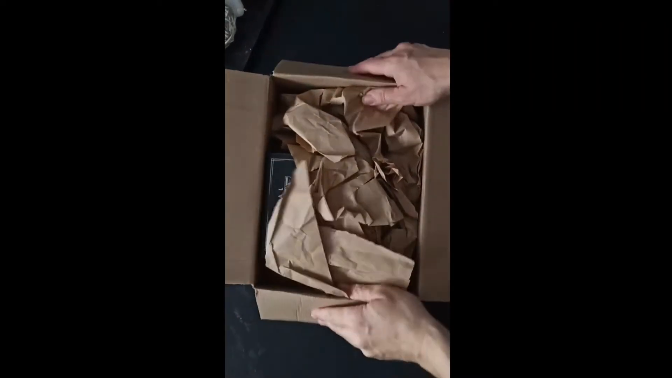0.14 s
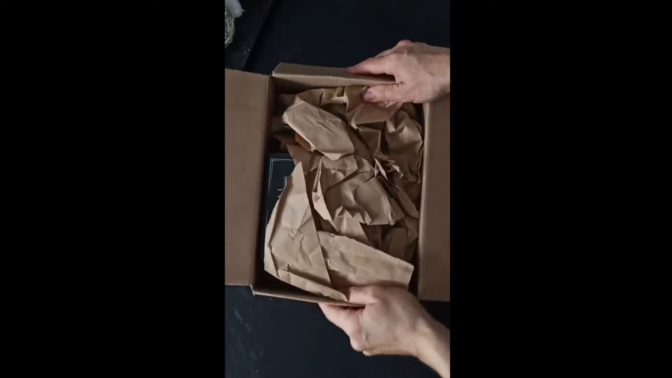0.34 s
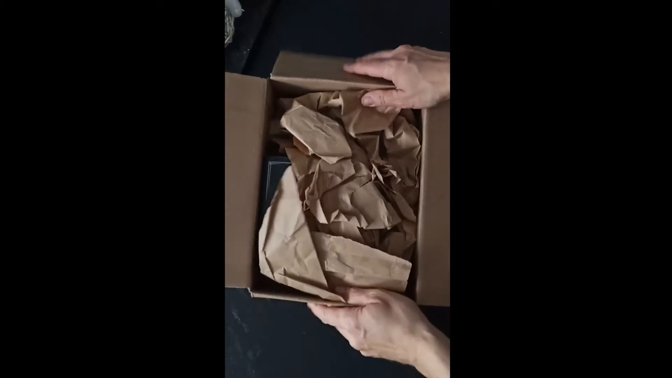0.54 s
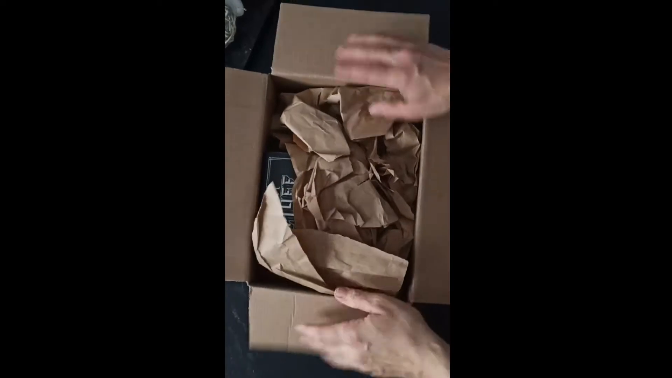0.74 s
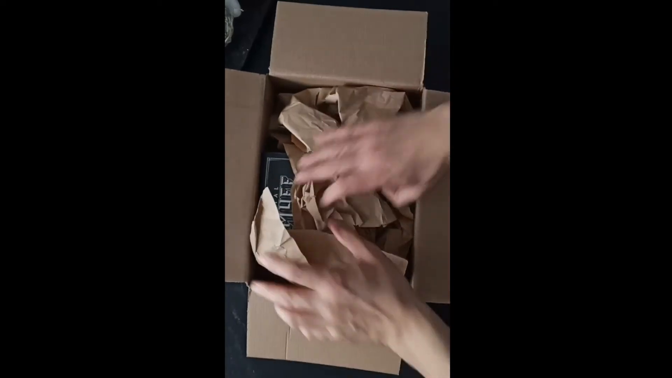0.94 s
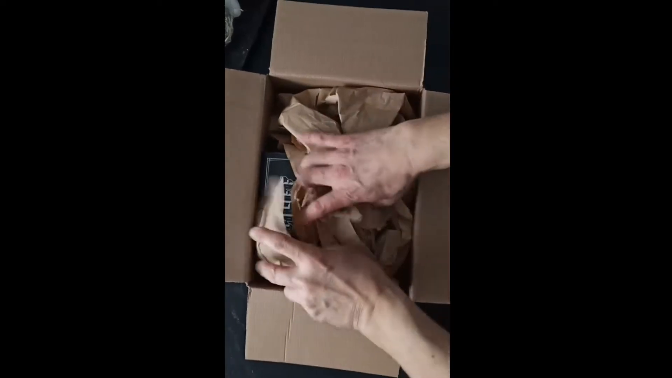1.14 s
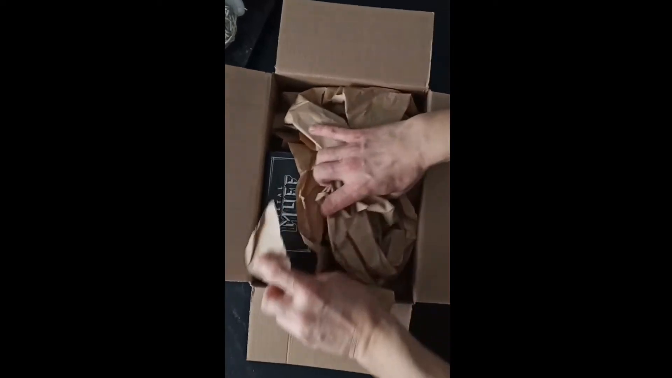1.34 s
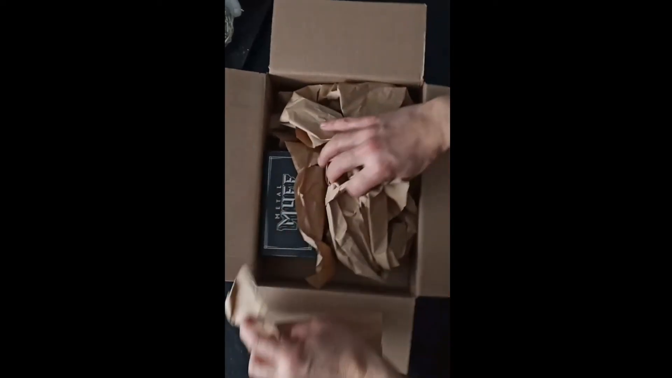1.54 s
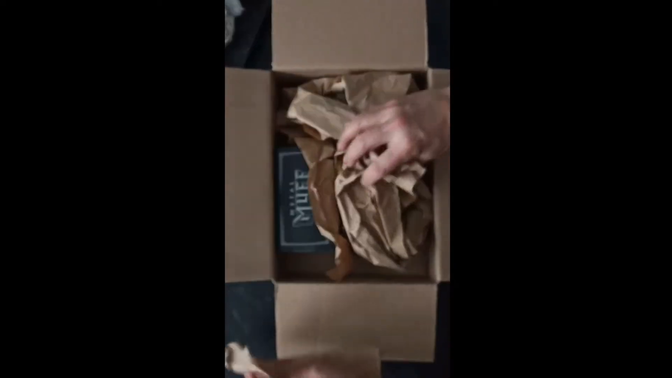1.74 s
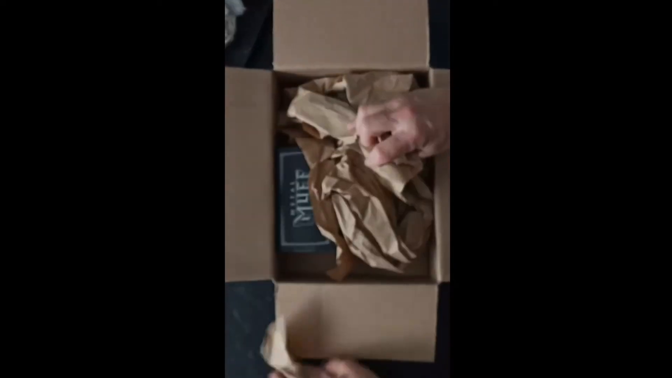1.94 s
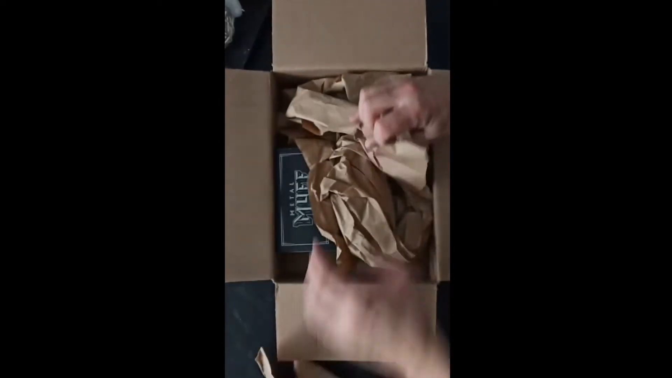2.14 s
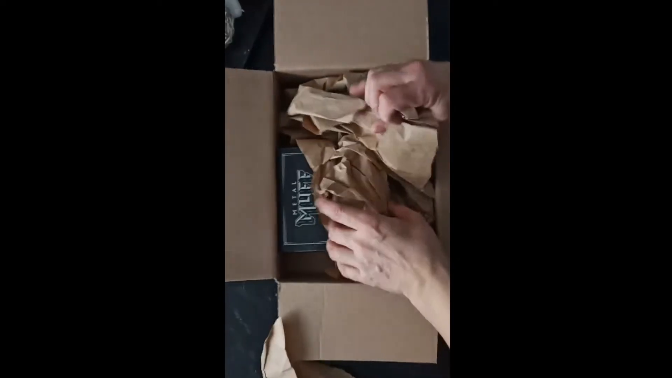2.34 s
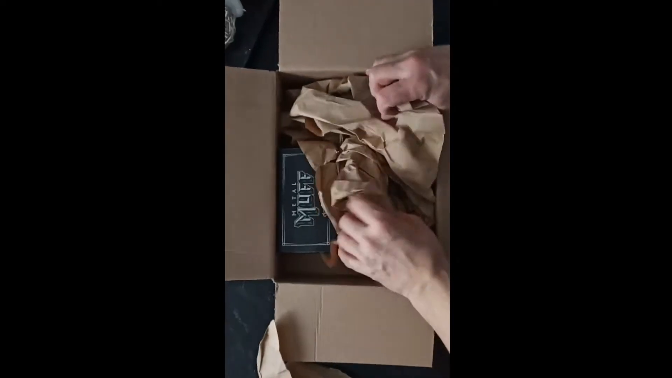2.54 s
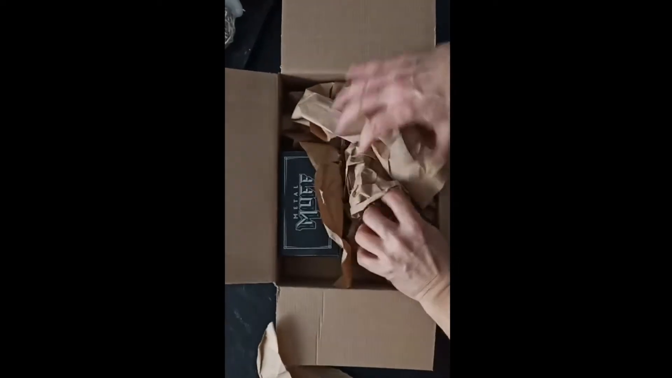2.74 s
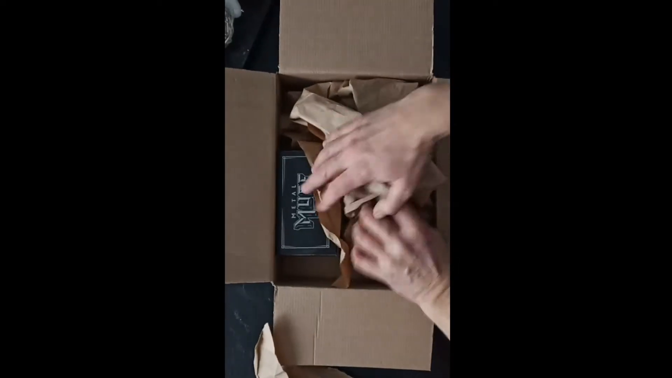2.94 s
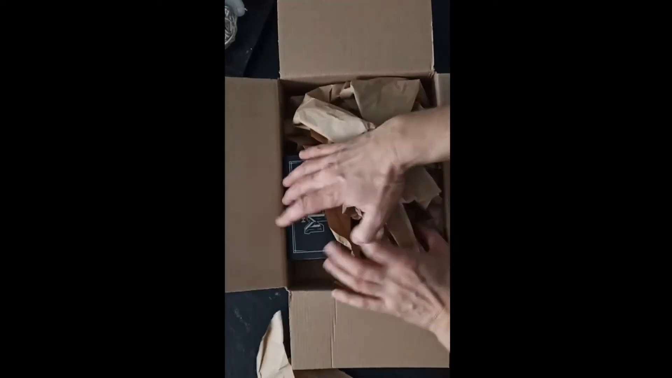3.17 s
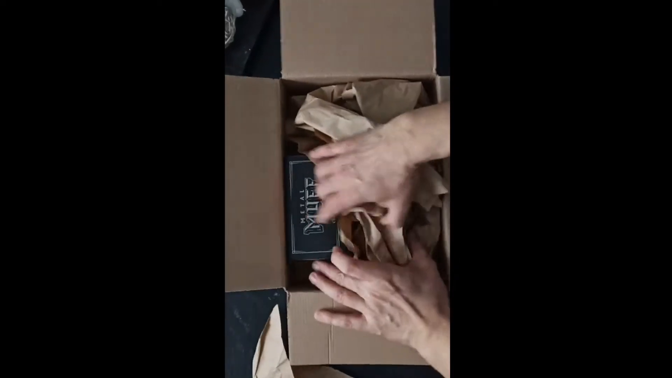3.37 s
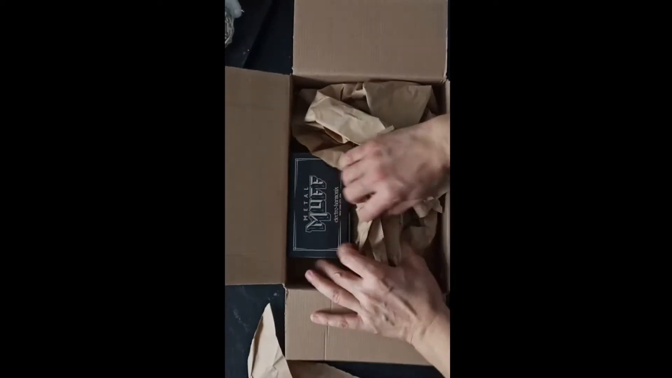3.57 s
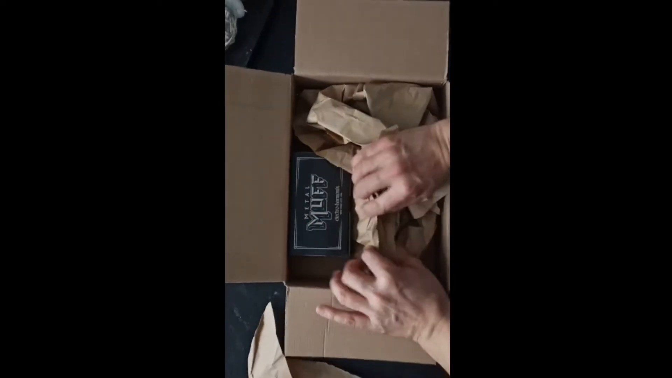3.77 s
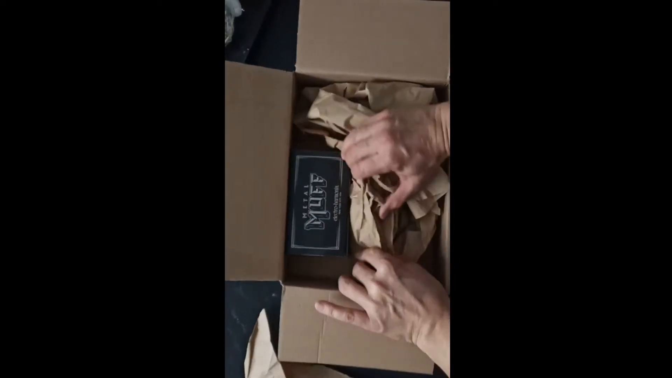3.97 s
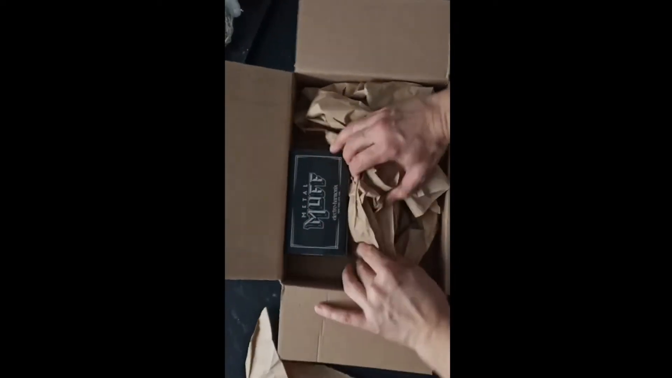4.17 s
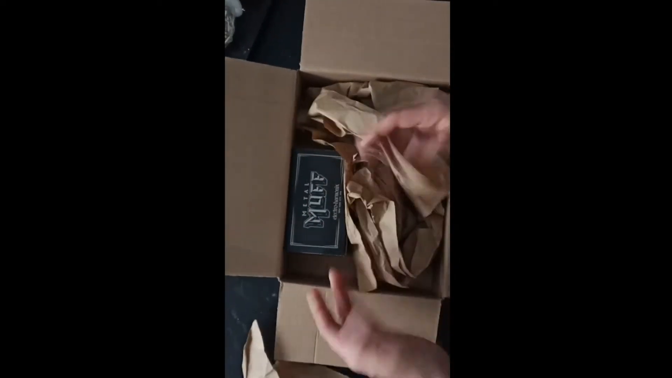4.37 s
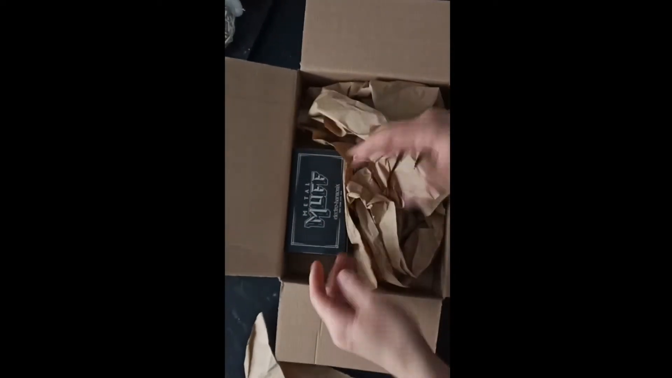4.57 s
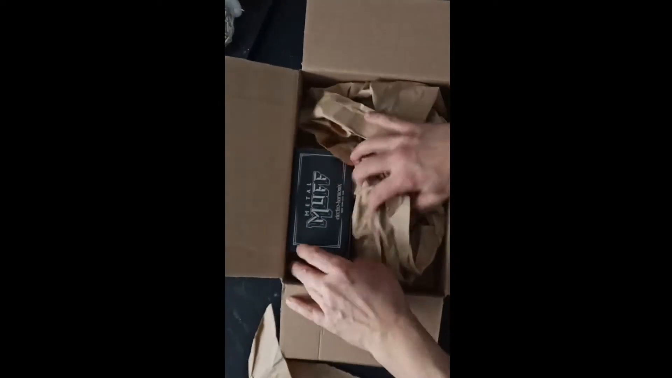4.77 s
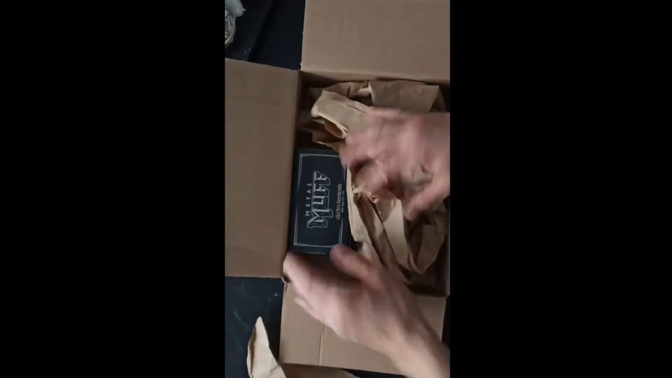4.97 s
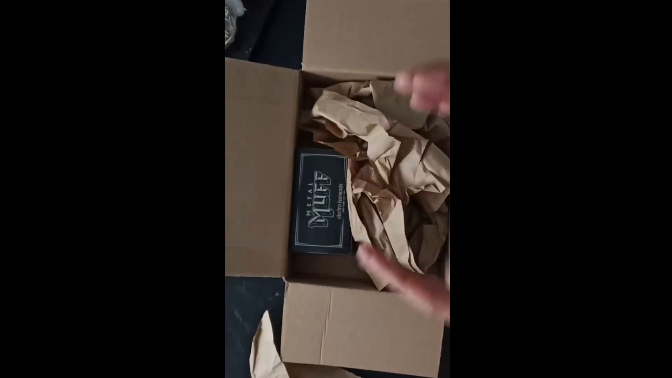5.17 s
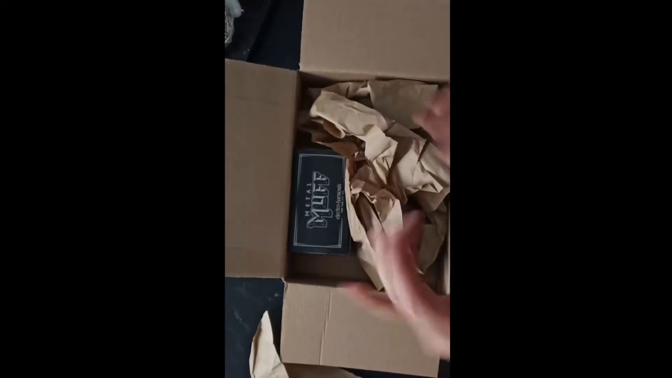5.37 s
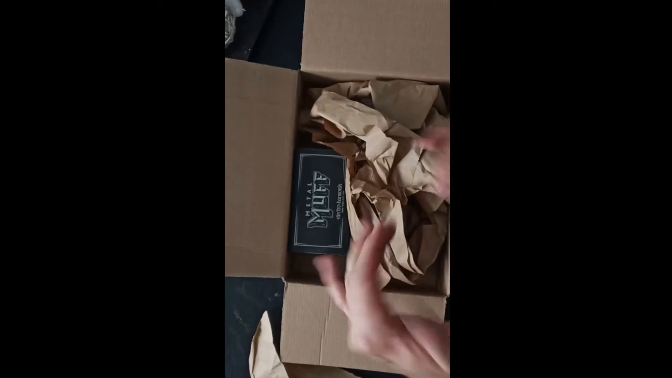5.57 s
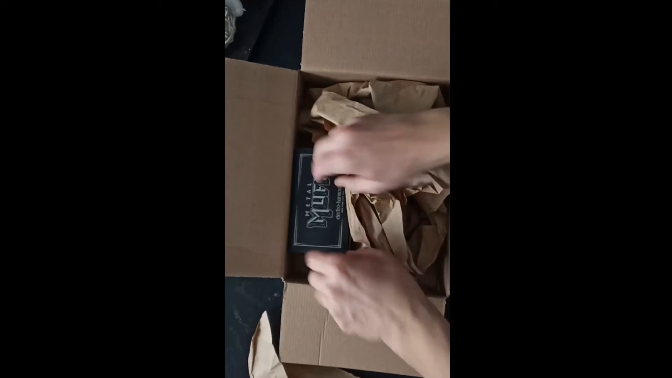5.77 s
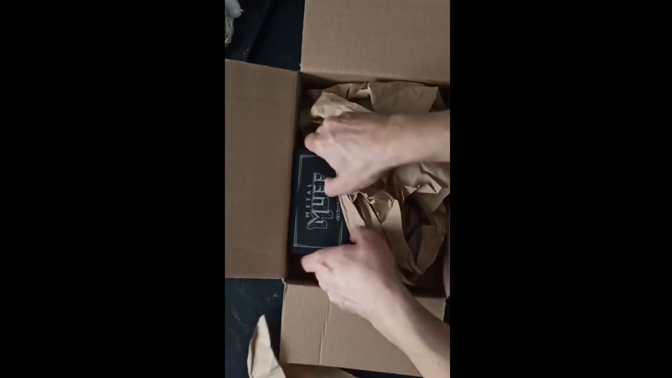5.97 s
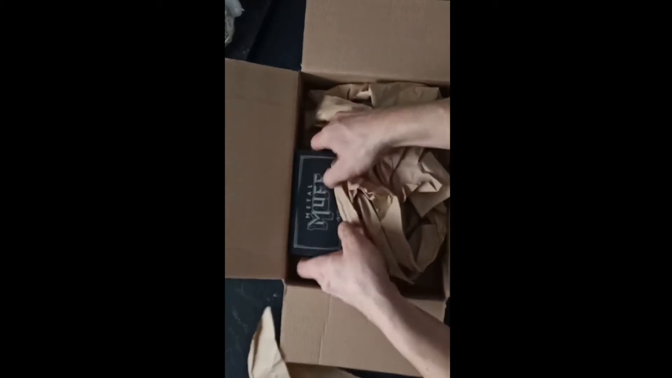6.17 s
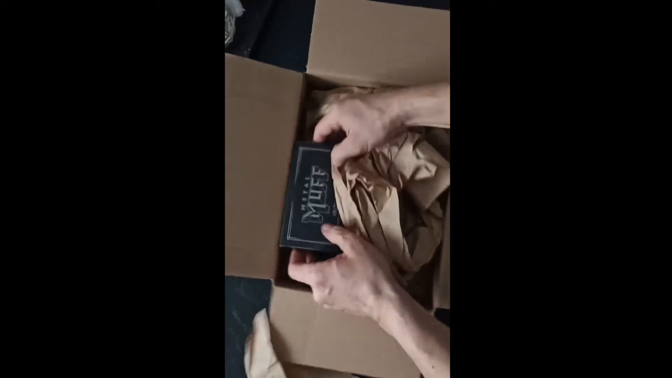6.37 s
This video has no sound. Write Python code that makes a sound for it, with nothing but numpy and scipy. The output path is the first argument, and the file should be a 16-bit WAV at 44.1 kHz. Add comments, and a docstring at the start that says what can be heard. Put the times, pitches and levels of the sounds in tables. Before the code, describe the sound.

Crumpled packing paper crinkles close to the microphone as hands push and pull it around a cardboard box. The rustling swells and fades in quick, uneven strokes, mixing fine crackle, sliding hiss and louder pops, with occasional dull bumps on the cardboard. It eases briefly near the start and stops for a moment before a final burst. The small room rings only slightly.

```python
"""Crumpled kraft paper rustles, close to a phone, as hands fold back the flaps of a cardboard box and rummage.
Each push or pull swells, holds and dies away: creases buckle in thousands of tiny crinkles and some
loud snaps, and sheets slide on each other. Flaps and hands bump the hollow box, and a small room
rings briefly after it all."""
import sys
import numpy as np
from scipy import signal
from scipy.fft import rfft, irfft, next_fast_len
from scipy.io import wavfile
from scipy.ndimage import uniform_filter1d

SR = 44100
rng = np.random.default_rng(int(sys.argv[2]) if len(sys.argv) > 2 else 0)


def to_wav(sig):
    """Store sig (one row per channel, or 1-D mono) as 16-bit WAV at the path in sys.argv[1].

    Samples outside -1..1 are clipped; the rate is SR.
    """
    pcm = np.clip(np.atleast_2d(sig), -1, 1) * 32767
    pcm = np.round(pcm).astype(np.int16)
    wavfile.write(sys.argv[1], SR, pcm.T)  # frames by channels


N = 282681
GRAIN_SAMPLES, TOP_HZ = 1024, 15600


def undb(db):
    """Decibels to gain."""
    return 10 ** (np.asarray(db) / 20)


def unit(x):
    """Scale to rms 1."""
    return x / np.sqrt(np.mean(x ** 2))


def colour(x, points):
    """Minimum-phase filter through (freq_hz, gain_db) points."""
    hz, db = np.transpose(points)
    grid_hz = np.maximum(np.fft.rfftfreq(2 * GRAIN_SAMPLES, 1 / SR), 1)
    gain = undb(np.interp(np.log(grid_hz), np.log(hz), db))
    cepstrum = irfft(np.log(gain))[:GRAIN_SAMPLES]
    cepstrum[1:] *= 2
    impulse = irfft(np.exp(rfft(cepstrum, 2 * GRAIN_SAMPLES)))
    return signal.fftconvolve(x, impulse)[:len(x)]


def band(x, hz, kind, order=2):
    """Butterworth low-pass or high-pass."""
    return signal.sosfilt(signal.butter(order, hz, kind, fs=SR, output="sos"), x)


def resonance(hz, centre_hz, q):
    """Complex response of one damped resonance, gain 1 at its centre."""
    return 1 / (1 + 1j * q * (hz / centre_hz - centre_hz / np.maximum(hz, 1)))


def place(start_s, sounds):
    """Mix in one row of samples at each start."""
    index = (start_s * SR).astype(int)[:, None] + np.arange(sounds.shape[1])
    return np.bincount(index.ravel(), sounds.ravel(), N)[:N]


# Pushes and pulls. Hollow is the bass gain of large sheets, edge the treble gain of tight creases.
# start_s, attack_s, hold_s, release_s, level_db, hollow_db, edge_db
STROKES = [(0.0, 0.0021, 0.1, .05, -44, 11, 1.5), (0.085, 0.063, 0.12, 0.19, -26.5, 2, -0.5),
           (0.348, .035, .02, 0.18, -32, 7.5, 0.5), (0.43, 0.065, 0.0035, .04, -20, 5, 1),
           (0.473, 0.016, 0.017, 0.29, -29.5, 7, -9), (0.643, 0.085, 0.13, 0.1, -38, 10.5, 1.5),
           (1.145, .15, 0.047, .4, -28, 2.5, 0), (1.466, 0.088, .2, 0.086, -31.5, 2.5, 3),
           (1.752, 0.052, 0.19, 0.068, -37.5, 3.5, 3), (1.966, 0.034, 0.13, 0.26, -29.5, 0, -3),
           (2.244, 0.042, 0.0078, 0.18, -28.5, 5.5, -1), (2.315, 0.062, 0.033, 0.27, -29, 4, -1),
           (2.495, 0.047, 0.13, 0.18, -29.5, 1, 0), (2.666, 0.037, .07, 0.27, -29.5, 3.5, 0),
           (2.802, 0.026, 0.015, 0.47, -26, 1.5, -1.5), (3.1, 0.058, 0.063, 0.41, -33, 4.5, 0.5),
           (3.388, 0.063, 0.029, .06, -32.5, 1.5, -0.5), (3.474, .04, .28, 0.56, -29.5, 4, 0),
           (3.919, 0.13, 0.025, 0.79, -27, 2.5, 0.5), (4.293, 0.17, 0.022, 0.052, -26, 0.5, -0.5),
           (4.48, 0.048, 0.07, 0.36, -37.5, 3, -2.5), (4.685, .04, 0.097, 0.12, -47.5, -15, 6),
           (4.857, 0.048, 0.1, 0.11, -28, 4.5, 1), (5.076, 0.041, 0.0057, 0.17, -28, 3, 2),
           (5.218, 0.038, .005, 0.054, -44, 2.5, -3), (5.964, 0.018, .17, .05, -36, 3, 2),
           (6.156, 0.0074, 0.15, 0.17, -28.5, 5.5, 0.5)]


def hands():
    """Each stroke swells, holds and lets go; in an overlap the stronger one dominates the colour."""
    t = np.arange(N) / SR
    powers = []
    for start_s, attack_s, hold_s, release_s, level_db, _, _ in STROKES:
        corners_s = start_s + np.cumsum([0, attack_s, hold_s, release_s])
        powers.append(undb(2 * level_db) * np.interp(t, corners_s, [0, 1, 1, 0]) ** 4)
    total = np.sum(powers, axis=0)
    hollow_db, edge_db = np.transpose(STROKES)[-2:] @ np.array(powers) / (total + 1e-18)
    return np.sqrt(total), hollow_db, edge_db


def buckles(facet_hz, t60_s, sheet_hz, sheet_db, crack_db, facet_q, sheet_q, spike):
    """One unit-energy burst per crease: a broad crack, its facet's ring, the knock of the sheet behind."""
    t = np.arange(GRAIN_SAMPLES) / SR
    burst = rng.standard_normal((len(facet_hz), len(t))) * undb(-60 * t / t60_s[:, None])
    burst[:, 0] = spike * np.sign(burst[:, 0])  # the fold flips at once, then flutters
    hz = np.fft.rfftfreq(2 * len(t), 1 / SR)
    crack = undb(crack_db)[:, None] * hz / (hz + 700)
    facet = resonance(hz, facet_hz[:, None], facet_q)
    sheet = undb(sheet_db)[:, None] * resonance(hz, sheet_hz[:, None], sheet_q)
    grains = irfft(rfft(burst, 2 * len(t)) * (crack + facet + sheet))[:, :len(t)]
    return grains / np.sqrt(np.sum(grains ** 2, axis=1, keepdims=True))


def crinkles(count=4000, spread_db=1.5, cap_db=10.5, mid_t60_s=0.021, mid_hz=4410.0, spread_oct=1.69):
    """Small creases give way at random, many faint and a few strong, each with its own pitch and ring."""
    when, size = rng.random((count, 2)).T
    pitch, ring, span, knock, crack = rng.uniform(-1.007, 1, (count, 5)).T
    level_db = np.minimum(-spread_db * np.log(1 - size), cap_db)
    facet_hz = np.minimum(mid_hz * 2 ** (spread_oct * pitch), TOP_HZ)
    t60_s = mid_t60_s * 2 ** ring * np.sqrt(mid_hz / facet_hz)  # small facets stop sooner
    grains = buckles(facet_hz, t60_s, sheet_hz=751.5 * 3 ** span, sheet_db=-4 + 9 * knock,
                     crack_db=-7 + 7 * crack, facet_q=4.14, sheet_q=18.0, spike=3.86)
    return unit(place(when * N / SR, grains * undb(level_db)[:, None]))


# Colour of kraft paper: freq_hz, gain_db
PAPER_COLOUR = [(40, -35), (80, -14), (160, -3), (350, 0.5), (1400, -0.5), (2300, -3.5), (3500, 0),
                (5000, -1), (6600, 1), (8100, -10), (10200, -2.5), (12200, -11), (13900, -11.5),
                (14700, -5.5)]


def rustle(slide_db=-6.5, hollow_hz=1280.0, edge_hz=6300.0):
    """Crinkles and sliding hiss follow the hands; big sheets sound hollow, tight creases bright."""
    effort, hollow_db, edge_db = hands()
    paper = unit(colour(crinkles() + undb(slide_db) * rng.standard_normal(N), PAPER_COLOUR))
    size = next_fast_len(N)
    hz, spectrum = np.fft.rfftfreq(size, 1 / SR), rfft(paper, size)
    low = irfft(spectrum / (1 + (hz / hollow_hz) ** 4), size)[:N]
    high = paper - irfft(spectrum / (1 + (hz / edge_hz) ** 8), size)[:N]
    return effort * (paper + (undb(hollow_db) - 1) * low + (undb(edge_db) - 1) * high)


# Big creases snapping through: start_s, level_db, pitch_hz, sharpness_db
SNAPS = [(0.075, -10, 3760, -2), (0.1753, -3.5, 6800, -5), (0.203, -4.5, 12100, -6.5),
         (0.29, -14.5, 4900, 5), (0.3107, -8, 12100, 9), (0.3713, -10, 3900, 9), (0.3784, -12.5, 6560, -6),
         (0.4077, -5, 9800, 4.5), (0.437, -3, 7800, -0.5), (0.6759, -16, 5450, 0), (0.721, -16, 3550, -12),
         (0.81, -13.5, 8500, -2), (1.2463, -8.5, 3900, 16), (1.309, -13, 6000, 20.5),
         (1.3668, -13.5, 9500, -11), (1.381, -8, 5900, 27), (1.4262, -18, 2400, 10.5),
         (1.464, -13, 6900, 1), (1.5261, -10.5, 7550, -7), (1.5727, -7, 2600, 10),
         (1.641, -5.5, 11300, -4.5), (1.824, -10.5, 2770, 2), (1.8695, -19, 3750, -5.5),
         (1.9632, -9.5, 8800, -5), (2.0077, -10.5, 6600, 0), (2.0264, -9.5, 2730, 2), (2.0738, -4, 4500, 2),
         (2.1441, -3.5, 7500, 13), (2.2365, -8, 3080, 0), (2.2815, -6.5, 6130, 1), (2.2905, -7, 3100, 4.5),
         (2.3618, -3, 2440, 0.5), (2.388, -13, 1500, 3), (2.399, -5.5, 4400, 9), (2.504, -11, 6640, 3),
         (2.5433, -13, 5600, -14), (2.7196, -9.5, 1460, -3), (2.7372, -7, 10000, -11), (2.85, -3, 6200, 14),
         (2.8832, -6.5, 5900, 4.5), (2.969, -12, 3180, 7), (3.152, -12.5, 6800, 2.5),
         (3.2222, -3.5, 3300, -2.5), (3.2226, -9.5, 720, -20), (3.522, -8, 6600, 5),
         (3.5392, -12, 4450, -5.5), (3.65, -8.5, 10600, -8.5), (3.7891, -4.5, 5900, 19),
         (3.816, -10, 5000, 7), (3.9372, -9.5, 2300, 0), (4.0016, -9, 3400, -5), (4.072, 0, 12000, -6.5),
         (4.1132, -7, 3100, 6), (4.26, -15, 4400, 1), (4.472, -10.5, 3460, -1), (4.5471, -16, 2600, -16),
         (4.5826, -12, 4080, -5.5), (4.6979, -12.5, 7800, -10), (4.757, -22, 1400, -3),
         (4.9778, -4.5, 5200, 12), (4.9919, -3.5, 2110, 7), (5.027, -10, 4500, 14), (5.114, -8, 8800, 6),
         (5.1422, -4, 3180, 15.5), (5.1895, -8, 12100, 1), (5.2555, -19, 4480, -5),
         (5.3753, -20.5, 4780, -15), (6.0372, -16, 5470, 12), (6.165, -29, 9500, 0), (6.2565, -6, 1480, 4),
         (6.3449, -8.5, 1460, -5)]


def snaps(gain_db=12.0, mid_t60_s=0.021, mid_hz=4400.0):
    """Big creases pop; small facets ring high and short, and a harder crack knocks the sheet more."""
    start_s, level_db, pitch_hz, sharpness_db = np.transpose(SNAPS)
    sheet_hz = 890 * 2 ** rng.uniform(-0.4, 0.4, len(start_s))
    t60_s = mid_t60_s * np.sqrt(mid_hz / pitch_hz)
    pops = buckles(pitch_hz, t60_s, sheet_hz, sheet_db=-19.5 + 0.96 * sharpness_db,
                   crack_db=-3.5 + sharpness_db, facet_q=5.1, sheet_q=1.2, spike=3.6)
    return undb(gain_db) * colour(place(start_s, pops * undb(level_db)[:, None]), PAPER_COLOUR)


# Modes of the box walls and the air between them: freq_hz, level_db, t60_s
BOX_MODES = [(72, -1, 0.41), (137, -1.5, 0.4), (179, -5, 0.41), (230, -5.5, 0.34), (282, -4, 0.25),
             (338.5, 6, 0.44), (408, 7, 0.31), (612, -25.5, .2), (762, -6, 0.23)]
# Flaps and hands hitting the box: start_s, level_db, pitch_hz, scuff_t60_s, boom_db
BUMPS = [(0.148, -28, 400, 0.1, -7), (0.241, -29, 600, 0.06, -9), (0.5, -17, 240, 0.037, -21),
         (.543, -31.5, 700, .04, -11), (.854, -26, 270, 0.064, -3), (1.573, -31, 320, .033, -17),
         (1.644, -41.5, 200, 0.058, 4), (2.144, -29, 326, 0.088, -5), (2.539, -31.5, 336, 0.051, -4),
         (2.865, -39, 200, 0.034, 0.5), (3.351, -26.5, 317.3, 0.081, -4), (3.805, -30.5, 700, 0.045, -42),
         (4.112, -28, 300, 0.046, -35), (4.857, -46.5, 200, 0.072, 4.5), (4.992, -34, 250, 0.021, -18),
         (5.16, -37.5, 200, 0.04, -5.5), (5.991, -37.5, 180, 0.018, -4.5), (6.166, -33.5, 330, 0.031, -9.5)]


def bumps(dull_hz=2440.0, ring_db=-1.0, thud_db=0.5, thud_hz=138.0, thud_t60_s=0.07, rise_s=0.0031):
    """Each bump is a short dull scuff of cardboard, a thud of pushed air and the ring of the box."""
    t = np.arange(SR // 2) / SR
    hz = np.fft.rfftfreq(len(t), 1 / SR)
    mode_hz, mode_db, mode_t60_s = np.transpose(BOX_MODES)[:, :, None]
    thud_envelope = undb(thud_db - 60 * t / thud_t60_s) * (1 - np.exp(-t / rise_s))
    thud = thud_envelope * np.sin(2 * np.pi * thud_hz * t)
    sounds = []
    for _, level_db, pitch_hz, scuff_t60_s, boom_db in BUMPS:
        contact = rng.standard_normal(len(t)) * undb(-60 * t / scuff_t60_s)
        scuff = irfft(rfft(contact) * resonance(hz, pitch_hz, q=1.35) ** 2)
        scuff /= np.sqrt(np.sum(scuff ** 2) / (SR * scuff_t60_s / 6))
        # each spot on the box drives the modes a little differently
        detune, side = rng.standard_normal((2, len(BOX_MODES), 1))
        tones = np.sign(side) * np.sin(2 * np.pi * mode_hz * (1 + 0.0076 * detune) * t)
        modes = tones * undb(mode_db - 60 * t / mode_t60_s)
        ring = undb(ring_db) * modes.sum(0) / np.sqrt(len(BOX_MODES))
        push = undb(1.72 * (level_db + 28.5))  # harder bumps push out more air
        sounds.append(undb(level_db) * (scuff + undb(boom_db) * (push * thud + ring)))
    start_s = np.transpose(BUMPS)[0]
    return band(place(start_s, np.array(sounds)), dull_hz, "low")


# Air pockets between paper and box walls: centre_hz, q, level_db
AIR_POCKETS = [(338, 16, -6.5), (460, 2.1, -11.5), (577, 10, -1), (733, 27, 4), (902, 19, -4),
               (1090, 29, -2.5), (1450, 36, 0), (1610, 97, -5), (2210, 40, -2.5), (2390, 68, -2),
               (3443, 110, -18)]


def pockets(x, ring_db=-7.0):
    """The hollows in the packed box ring along with the paper."""
    size = next_fast_len(N + SR // 4)
    hz = np.fft.rfftfreq(size, 1 / SR)
    response = sum(undb(level_db) * resonance(hz, centre_hz, q) for centre_hz, q, level_db in AIR_POCKETS)
    return x + undb(ring_db) * irfft(rfft(x, size) * response, size)[:N]


def room(x, t60_s=0.46, treble_t60_s=0.25, treble_db=-5.0, split_hz=3750.0, bass_hz=171.0, gap_s=0.0058):
    """A small room: a diffuse tail with little bass, whose treble dies sooner."""
    t = np.arange(SR // 2) / SR
    low = band(rng.standard_normal(len(t)), split_hz, "low") * undb(-60 * t / t60_s)
    high = band(rng.standard_normal(len(t)), split_hz, "high") * undb(treble_db - 60 * t / treble_t60_s)
    tail = band((low + high) * (t > gap_s), bass_hz, "high")
    return signal.fftconvolve(x, tail / np.sqrt(np.sum(tail ** 2)))[:N]


def scene(room_db=-12.5):
    """Paper and box in the room, mono."""
    near = pockets(rustle() + snaps()) + bumps()
    return (near + undb(room_db) * room(near))[None]


def suppress(x, threshold_db=-75.5, tilt_db_per_oct=-5.0, floor_db=-21.0, frame_samples=512):
    """Noise suppressor: each band that sinks towards the threshold is turned down."""
    hz, _, frames = signal.stft(x, SR, nperseg=frame_samples)
    power = uniform_filter1d(np.abs(frames) ** 2, size=3, axis=-1)
    power = uniform_filter1d(power, size=3, axis=-2)
    octaves = np.log2(np.maximum(hz[:, None], 200) / 1000)
    threshold = undb(threshold_db + tilt_db_per_oct * octaves) ** 2
    gain = np.maximum(power ** 2 / (power ** 2 + threshold ** 2), undb(floor_db))
    return signal.istft(frames * gain, SR, nperseg=frame_samples)[1][:, :N]


# Colour of the faint hiss in the pauses: freq_hz, gain_db
HISS_COLOUR = [(30, 2.5), (300, -6.5), (900, -4), (2000, -5.5), (6000, -15.5), (9000, -21), (15000, -18.5)]
HISS_DB, LOW_CUT_HZ = -77, 66


def record(dry):
    """The phone thins the deep bass, hushes quiet sound, adds a faint even hiss and cuts the top."""
    hushed = suppress(band(dry, LOW_CUT_HZ, "high", order=5))
    hiss = undb(HISS_DB) * unit(colour(rng.standard_normal(N), HISS_COLOUR))
    top_cut = signal.ellip(10, 0.2, 70, TOP_HZ, fs=SR, output="sos")
    return signal.sosfilt(top_cut, hushed + hiss)


dry = scene()
out = record(dry)
to_wav(out)
```